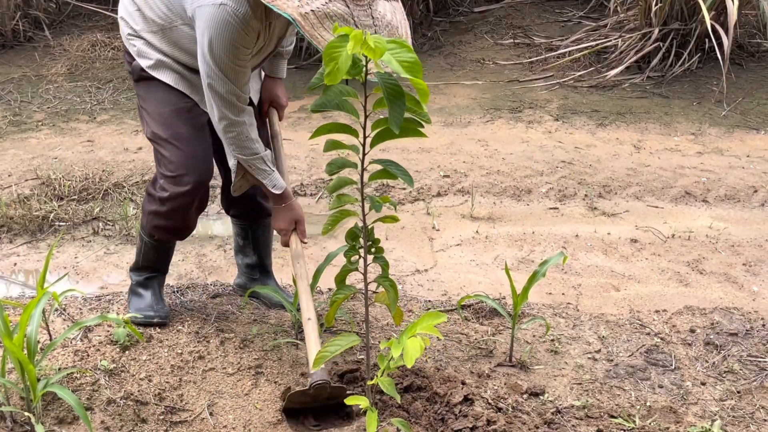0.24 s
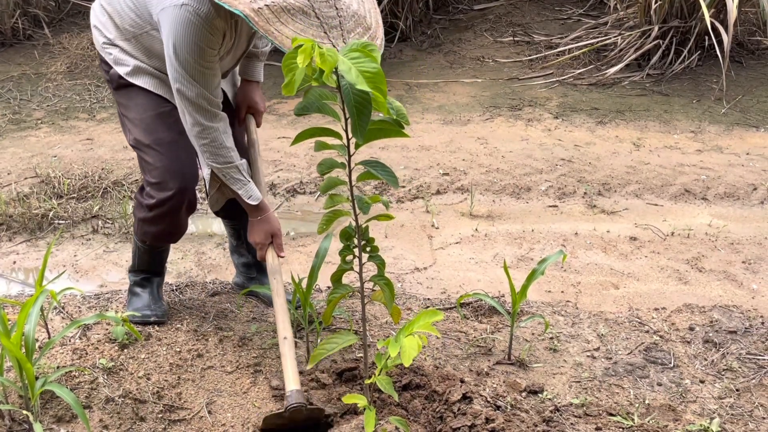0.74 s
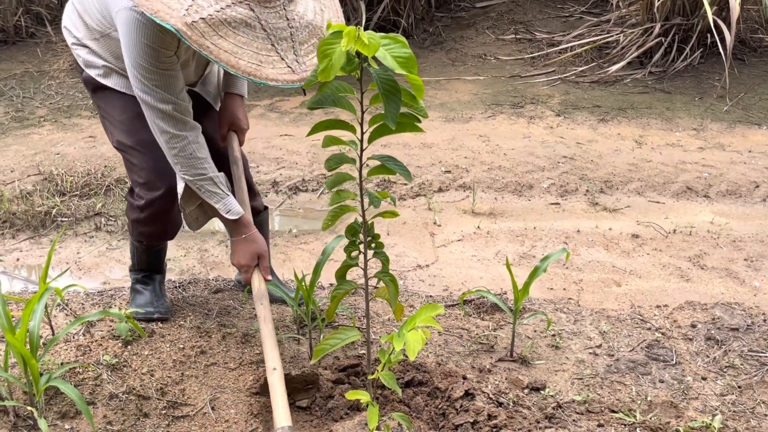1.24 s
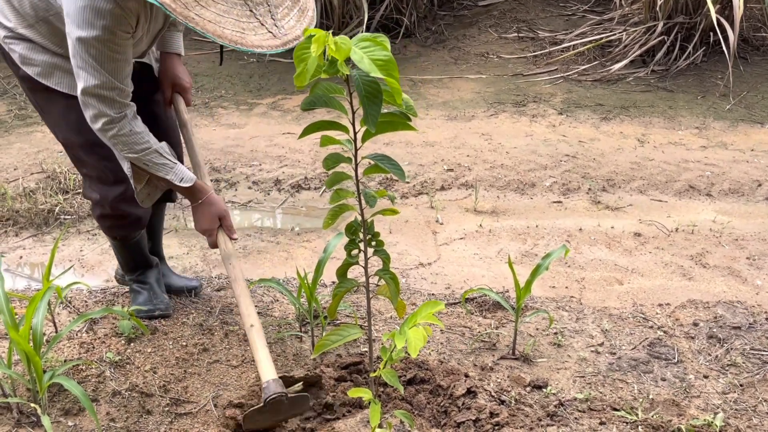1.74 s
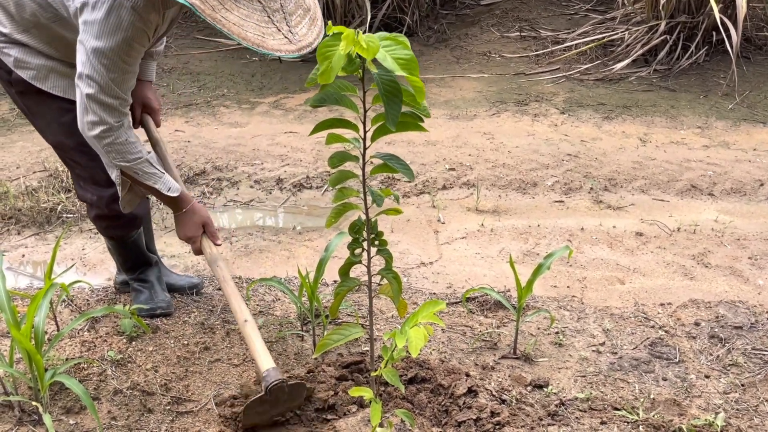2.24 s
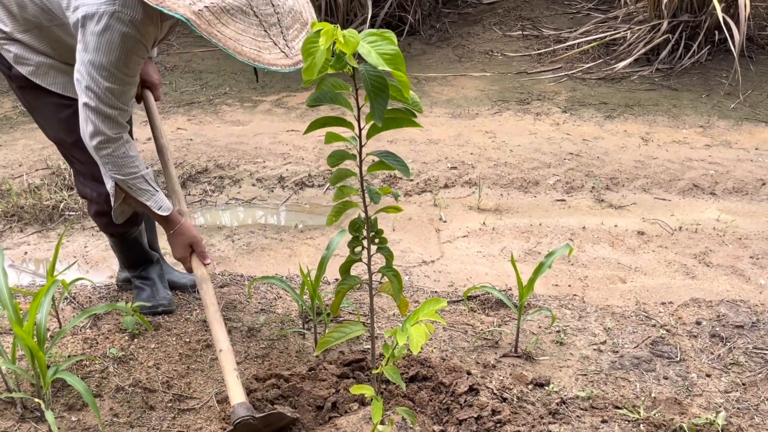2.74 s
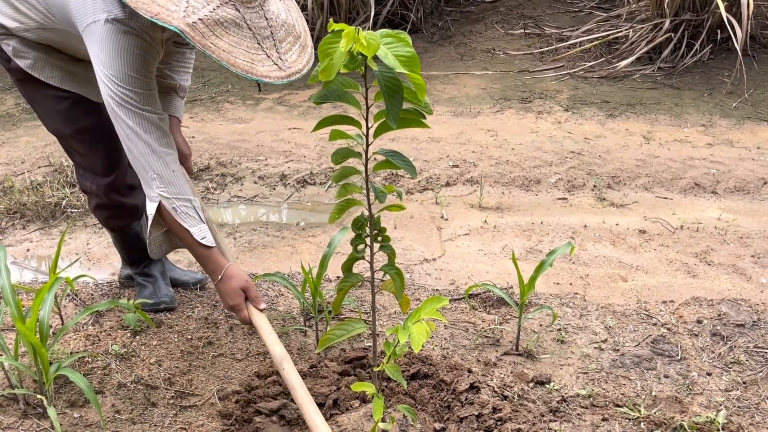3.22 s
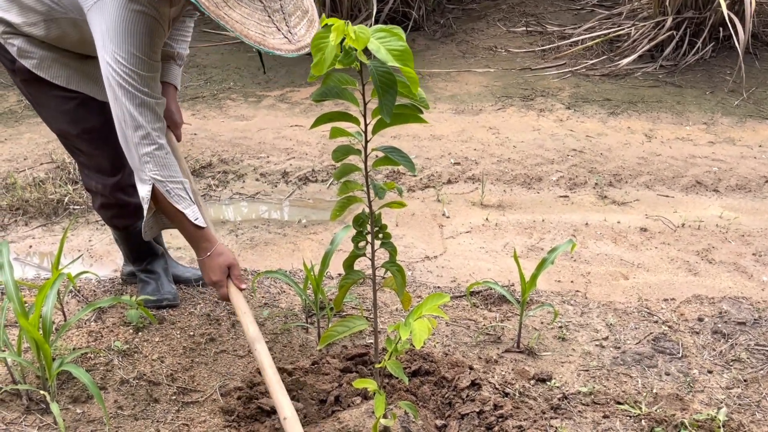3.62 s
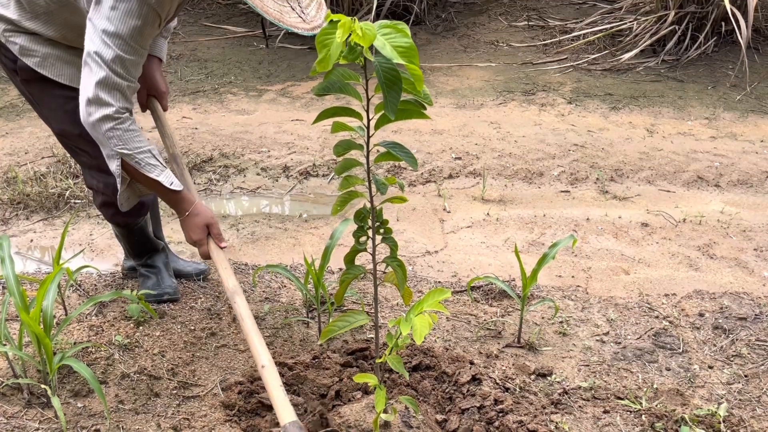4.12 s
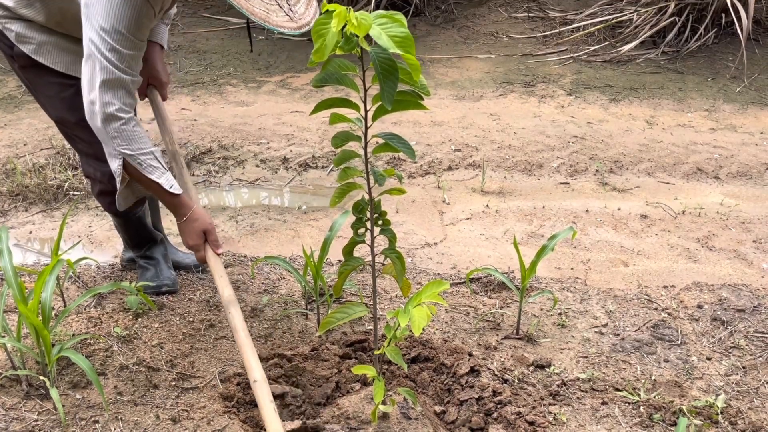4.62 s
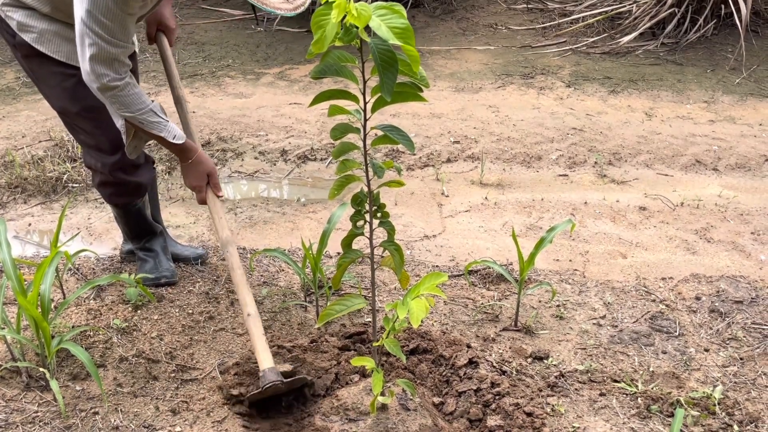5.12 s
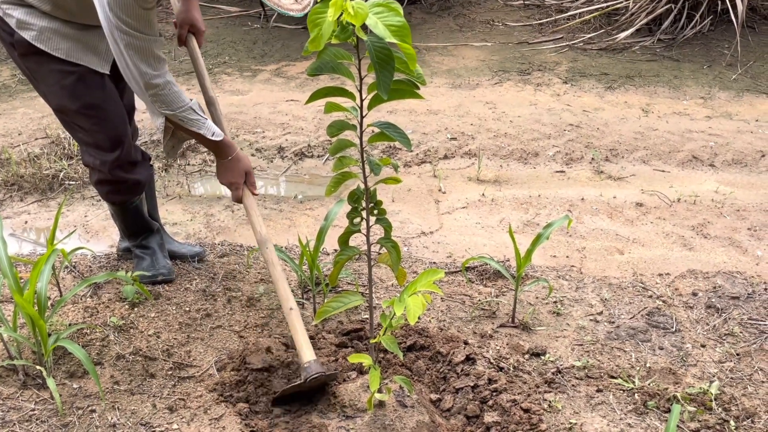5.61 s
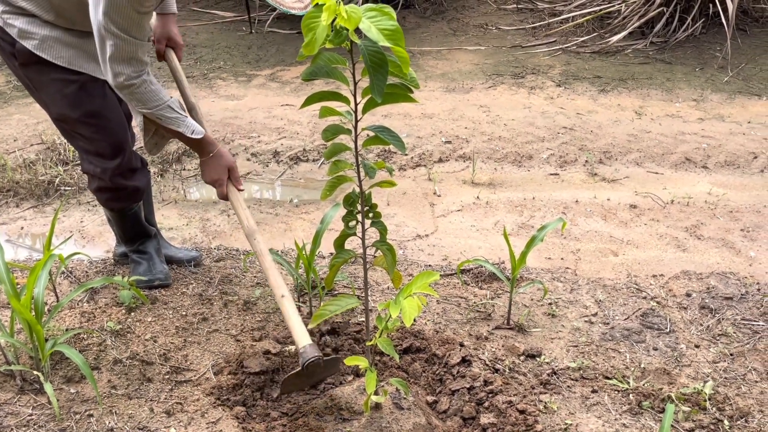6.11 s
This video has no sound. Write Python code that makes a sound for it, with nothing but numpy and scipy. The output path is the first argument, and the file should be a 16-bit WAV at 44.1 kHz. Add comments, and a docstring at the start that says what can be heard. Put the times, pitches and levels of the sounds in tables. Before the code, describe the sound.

A hoe chops and scrapes through gritty soil in steady strokes over a low engine drone, with faint bird hoots late on.

```python
"""From the start a pump engine drones far across the plot, over the faint hiss of the open field.
Close to a phone's two microphone ports a steel hoe chops and drags through gritty soil: friction
hisses and excites the blade's resonances, stones and clods crack against it, and the half-freed
steel tings. Near 2.8 s the edge rasps over a stone. From about 4.5 s, as the hoeing goes on,
a distant bird hoots a falling series."""
import sys
import numpy as np
from scipy import signal
from scipy.fft import rfft, irfft, next_fast_len
from scipy.io import wavfile
from scipy.ndimage import uniform_filter1d, map_coordinates

SR = 44100
rng = np.random.default_rng(int(sys.argv[2]) if len(sys.argv) > 2 else 0)


def bounce(signal):
    """Save signal as a 16-bit WAV file at the path given by the first command-line argument."""
    frames = np.transpose(np.atleast_2d(signal))
    limited = np.clip(frames, -1, 1)
    pcm = np.round(limited * 32767).astype(np.int16)
    wavfile.write(sys.argv[1], SR, pcm)


N = 280476

# Spectra of the field's hiss, the rumble, clods and gravel as heard: frequency_hz, relative_density_db
AIR_SPECTRUM = [(400, -22.5), (700, 9.5), (1500, 9), (3000, 2.5), (6000, -4.5), (10000, -13.5), (11500, -3),
                (13000, -43.5)]
RUMBLE_SPECTRUM = [(15, -23), (25, -35.5), (54, -6.5), (107, -2), (140, -2), (160, 0), (233, -6.5),
                   (325, -23), (401, -30.5), (472, -30.5), (591, -47.5), (900, -90), (1170, -72.5),
                   (1980, -120)]
CLOD_SPECTRUM = [(250, -1.5), (400, 1), (520, 4), (700, -4.5), (1100, -1), (1600, -13.5), (2500, -43)]
GRAVEL_SPECTRUM = [(700, -46), (1200, -4.5), (2000, -1), (3000, 2.5), (4000, -4), (6000, -26)]
# Hiss of grit as heard, the treble dropping away above 13 kHz: frequency_hz, relative_density_db
GRIT_SPECTRUM = [(500, -22), (1200, -25.5), (3000, -17), (6000, -13), (8000, -12.5), (10000, -7.5),
                 (11500, -1.5), (12500, -14.5), (13200, -21.5), (14200, -44.5), (15000, -33), (15800, -46)]
# Wavering loudness of the drone as heard, with chance dips in its tones:
# time_s, rumble_db, main_tone_db, neighbour_tone_db
DRONE_WAVER = [(0.0, -26.5, -34, -36), (0.26, -29, -35, -38.5), (1.31, -26, -33, -29),
               (1.43, -26, -33.5, -42.5), (1.7, -27, -33, -27.5), (1.84, -30.5, -40.5, -58),
               (1.91, -27.5, -35.5, -37.5), (2.85, -29, -35.5, -52), (2.91, -27.5, -39, -36.5),
               (3.72, -27.5, -36.5, -35), (4.38, -28.5, -36, -38), (4.53, -29, -38.5, -56.5),
               (4.71, -28, -36, -37.5), (4.89, -30.5, -39, -53.5), (4.99, -29, -35, -42),
               (5.85, -29.5, -33.5, -52), (6.13, -28, -32.5, -31), (6.36, -26.5, -45, -39.5)]
# Partials of the three engine tones: pitch_hz, relative_level_db, phase_wander_rad
LOW_PARTIALS = [(65.4, -2, 0.58), (126.9, -7, 1.21), (312.5, -19.5, 0.43)]
MAIN_PARTIALS = [(155.3, 1, 0.51), (474, -37.5, 0.98)]
NEIGHBOUR_PARTIALS = [(168.4, -1, 0.6), (217.3, -9, 1.62)]
# Successive hoots of the bird: level_db
HOOT_LEVELS = [-52.5, -51, -50, -50, -47, -52, -57]
# Normal modes of the free blade: pitch_hz, bandwidth_hz, gain_db
BLADE_MODES = [(2392, 35, -4), (3230, 22, -0.5), (4543, 35, 8), (4930, 130, 3), (6520, 71, 8.5),
               (6980, 32, -3.5), (9100, 32, -3.5), (8700, 180, -3)]
# Flicks of the half-freed blade: start_s, lowest_mode_drive_db, upper_modes_drive_db
BLADE_FLICKS = [(0.1844, -30.5, -43), (0.1925, -21, -50), (0.396, -42, -54), (0.422, -38, -71),
                (0.442, -52, -54), (0.6114, -49, -63), (0.9433, -35, -57), (0.9616, -34, -51),
                (1.6286, -38, -50), (1.648, -52, -50), (2.003, -31, -49), (2.192, -33.5, -55),
                (2.2136, -40, -61), (2.235, -33, -54), (2.6983, -46, -60), (2.7423, -35, -64),
                (2.783, -39, -52), (2.8202, -34, -41), (2.8397, -32.5, -50), (2.871, -45, -56),
                (4.0295, -47, -63), (4.048, -38, -54), (4.064, -34.5, -58), (5.3342, -56, -54)]
# Stones and clods meeting the blade: start_s, level_db, knock_offset_db, click_hz, click_offset_db
IMPACTS = [(0.165, -9.5, -31, 2730, -14), (0.1824, -14, -35, 2170, -10), (0.3866, -23, -26, 2500, -11),
           (0.526, -43, -10.5, 2110, -14), (0.7489, -17, -20, 5280, -19), (0.7915, -13, -24.5, 5440, -26),
           (1.0938, -36.5, -14, 1850, -20), (1.339, -22.5, -23.5, 2430, -21), (1.5274, -19, -28, 6500, -4),
           (1.628, -26.5, -19, 2540, -12), (1.771, -27, -21, 5000, -12), (1.7999, -24, -28, 5500, -17),
           (1.9069, -28.5, -21, 1910, -27), (2.0008, -26, -28, 2370, -2), (2.0236, -20.5, -10, 2450, -9),
           (2.0611, -15.5, -15, 4000, -3), (2.616, -26, -14, 2500, -6), (3.3903, -23.5, -12, 3130, -6),
           (3.4403, -39, -11.5, 2200, -12), (3.4529, -40.5, 1, 1860, 3), (3.5043, -38, -17, 2130, -18),
           (3.643, -23.5, -8, 3260, 0), (3.8413, -21.5, -14, 2530, -15), (3.905, -20, -2, 2800, -3.5),
           (3.9134, -24, -9, 2630, -8), (4.4383, -30, -25, 2470, -14), (4.482, -32.5, 3.5, 5000, -17),
           (4.6106, -30, -29, 3280, -9), (4.6589, -35, -19, 4770, 2), (4.8061, -35, -12, 2240, -19),
           (4.8304, -45, -6, 1860, -22), (4.8678, -46, -12.5, 6030, -17), (4.946, -10.5, -19, 2370, -22),
           (4.9786, -23, -5, 3180, -7), (5.339, -38, -20, 4700, -7), (5.4091, -39.5, -15, 2360, -25),
           (5.595, -38, -19, 5180, -13.5), (5.694, -22, -26, 4220, -3.5), (6.2688, -53, 2, 2600, -17)]
# Scrapes of the edge: start_s, rise_s, drag_start_db, drag_s, drag_end_db, fall_db_per_s,
# clod_offset_db, gravel_offset_db, lowest_mode_offset_db
SCRAPES = [(0.0, .002, -61, .1, -69.5, 408, 1, -1, 13),
           (0.152, 0.022, -28, 0.007, -21, 269, -19.5, -15.5, 10),
           (.19, 0.038, -35.5, 0.076, -30.5, 284, -12.5, -8.5, -3.5),
           (.36, .037, -41.5, .005, -45, 278, -19, -12, -1.5), (.47, .2, -57, .005, -58, 520, -7, -2.5, 3),
           (0.739, 0.013, -26.5, 0.042, -20.5, 458, -15, -12, 8.5),
           (.79, 0.022, -30, 0.099, -32.5, 283.5, -13.5, -9, 1),
           (1.16, .16, -67, 0.0088, -61, 400, 3, 3.5, -3),
           (1.331, 0.017, -27.5, 0.2, -34, 600, -14, -10, 7),
           (1.56, 0.021, -46, .03, -50, 200, -20, -4, 6.5),
           (1.61, 0.028, -43.5, .012, -45.5, 127.5, -15.5, -5, 11),
           (1.78, 0.019, -40, .005, -43.5, 400, -16, -18, -16),
           (1.79, 0.04, -48, 0.18, -60, 300, -7, -6.5, -25),
           (1.998, .006, -40, .012, -33, 300, -17, -10.5, 7),
           (2.016, 0.0088, -27, 0.05, -26, 232, -12.5, -7, 3),
           (2.16, 0.064, -40, .003, -37, 700, -30, -8, 5),
           (2.25, 0.021, -60.5, .13, -65.5, 200, -14, -3, 14),
           (2.4, .07, -61, .025, -59, 450, -12, -3.5, -10),
           (2.61, .008, -32, 0.039, -30.5, 230, -12.5, -10, 0.5),
           (2.66, 0.099, -37.5, 0.02, -41.5, 147, -12.5, -11, 5.5),
           (2.758, 0.035, -36, 0.031, -39, 331, -28, -14, 1.5),
           (2.84, 0.017, -49, 0.028, -51, 800, -24, -16, 4.5),
           (3.085, 0.042, -51, .12, -43.5, 448, -27, -40.5, -23),
           (3.378, 0.01, -40.5, .003, -35.5, 342, -9, -4.5, 6.5),
           (3.497, .01, -53.5, .1, -49, 300, -10, -5, 7),
           (3.605, 0.039, -36.5, 0.043, -36.5, 90, -14.5, -5.5, 4.5),
           (3.7, 0.054, -46.5, .085, -43.5, 188, -6, -2.5, 9.5),
           (3.825, 0.066, -33.5, 0.018, -33, 300, -16, -6, -3),
           (3.92, 0.023, -47.5, 0.11, -54.5, 200.5, -7, -1.5, 13),
           (4.02, 0.057, -45, 0.0046, -45, 800, -30, -7, 7), (4.08, .025, -70.5, .3, -85, 301, -5, 2.5, -2),
           (4.434, 0.0093, -44.5, 0.051, -36, 320, -11, -8.5, 3.5),
           (4.599, 0.01, -40.5, .002, -38, 800, -16, -11, -10.5),
           (4.651, 0.0086, -38, 0.016, -37, 378, -14, -8, -5),
           (4.915, .028, -46.5, 0.0022, -38, 520.5, -15, -13, 7),
           (4.946, 0.0019, -38, 0.014, -28, 206, -14, -6.5, 5.5),
           (5.03, 0.035, -41, .003, -39, 190, -11, -6, -1.5),
           (5.11, 0.042, -39.5, .003, -40.5, 296, -12.5, -5.5, 9.5),
           (5.313, 0.026, -49, 0.0026, -50.5, 200, -14, -8, -14),
           (5.49, .022, -68, 0.084, -71, 400, 0, -11.5, 1),
           (5.58, .012, -50.5, .02, -51.5, 300, -15, -12, 2),
           (5.6, 0.051, -38, 0.05, -41.5, 260, -13, -6, -1), (5.72, 0.01, -61, 0.075, -62, 200, 0, 2, 20),
           (5.8, 0.1, -56.5, .17, -66, 401, -7, -4.5, 14),
           (6.13, 0.031, -63.5, 0.011, -67.5, 802, -8, 2, 11.5)]
# The edge skating over a stone drives a single mode: time_s, relative_drive_db
STONE_RASP = [(2.67, -39.5), (2.7, -3.5), (2.8, -1.5), (2.85, -4), (2.88, -40)]
# Differences between the microphone ports: frequency_hz, left_lead_rad, left_excess_db, coherence (0-1)
PORT_RESPONSE = [(60, 0, .7, .98), (300, .05, 1.4, .96), (900, .1, 3, .86), (1500, .1, 3.5, .75),
                 (1900, 0, .6, .88), (2700, 1.2, -1, .8), (3200, 1.8, 2, .75), (4200, 1.6, 7.5, .45),
                 (4800, .1, 9, .3), (5800, .4, 5.5, .45), (6500, -.1, 1.5, .65), (7000, .4, 5, .65),
                 (7500, 1.1, 2.5, .6), (8500, 0, .1, .94), (9200, -1.2, .5, .78), (9850, -2.8, 0, .93),
                 (10250, -3.14, 0, .995), (10550, -3.5, 0, .9), (11000, -4.4, 0, .88),
                 (11800, -6.2, 0, .995), (12400, -6.28, 0, .99), (12900, -6.4, 0, .45),
                 (14300, -6.3, 0, .5), (14800, -6.28, 0, .99)]


def amp(db):
    """Amplitude ratio of a level in decibels."""
    return 10 ** (np.asarray(db) / 20)


def unit_rms(x):
    """Normalisation to unit mean power."""
    return x / np.sqrt(np.mean(x ** 2) + 1e-20)


def at_frequency(table, hz):
    """Interpolation of a table's columns on a logarithmic frequency axis."""
    knots_hz, *columns = np.transpose(table)
    return np.squeeze([np.interp(np.log(hz + 1), np.log(knots_hz + 1), c) for c in columns])


def over_time(table):
    """Linear interpolation of a table's columns, one value per sample."""
    times_s, *columns = np.transpose(table)
    return [np.interp(np.arange(N) / SR, times_s, c) for c in columns]


def wobble(rate):
    """Smooth random modulation with `rate` knots a second."""
    steps = np.arange(0, N + 64, 64)
    coarse = map_coordinates(rng.standard_normal(int(N * rate / SR) + 4), [steps * rate / SR])
    return np.interp(np.arange(N), steps, coarse)


def filtered(x, response, joined=False):
    """Linear filtering by a complex response; `joined` cross-fades mirrored ends against clicks."""
    size = next_fast_len(N + SR // 4)
    fade = np.linspace(1, 0, size - N)
    after_end = 2 * x[..., -1:] - x[..., -2:N - size - 2:-1]
    before_start = 2 * x[..., :1] - x[..., size - N:0:-1]
    padding = joined * (fade * after_end + (1 - fade) * before_start)
    spectrum = rfft(np.concatenate([x, padding], axis=-1))
    return irfft(spectrum * response(np.fft.rfftfreq(size, 1 / SR)), size)[..., :N]


def shaped(x, spectrum):
    """Zero-phase filtering by a tabulated spectrum."""
    return filtered(x, lambda hz: amp(at_frequency(spectrum, hz)))


def coloured(x, spectrum):
    """Spectral shaping at unit mean power."""
    return unit_rms(shaped(x, spectrum))


def air():
    """Ambient noise: the faint broadband hiss of the open field."""
    return amp(-65.5 + .8 * wobble(3)) * coloured(rng.standard_normal((2, N)), AIR_SPECTRUM)


def engine_tone(partials, level_db, swing_db):
    """Outdoor propagation modulates the amplitude and phase of each engine partial."""
    out, t = np.zeros(N), np.arange(N) / SR
    for hz, partial_db, wander_rad in partials:
        strength = amp(partial_db + swing_db * wobble(7))
        phase = 2 * np.pi * hz * t + wander_rad * wobble(5) + rng.uniform(0, 2 * np.pi)
        out += strength * np.sin(phase)
    return np.sqrt(2) * amp(level_db) * out


def pump():
    """Superposition: the engine's line spectrum lies over a continuous rumble, wavering as heard."""
    rumble_db, main_db, neighbour_db = over_time(DRONE_WAVER)
    hum = engine_tone(LOW_PARTIALS, level_db=-35.5, swing_db=2.4)
    hum += engine_tone(MAIN_PARTIALS, main_db, swing_db=2.0)
    hum += engine_tone(NEIGHBOUR_PARTIALS, neighbour_db, swing_db=3.0)
    rumble_gain = amp(rumble_db - 3.5 + 1.36 * wobble(6))
    rumble = rumble_gain * coloured(rng.standard_normal((2, N)), RUMBLE_SPECTRUM)
    return rumble + [[1], [0]] * hum


def bird(first_s=4.57, gap_s=.273, first_hz=383.2, drop_hz=9.2):
    """Frequency glide: each hoot is a rising pure tone in a Gaussian envelope, lower than the last."""
    out, t = np.zeros(N), np.arange(N) / SR
    for k, level_db in enumerate(HOOT_LEVELS):
        from_peak_s = t - first_s - k * gap_s
        envelope = amp(level_db) * np.exp(-(from_peak_s / 0.061) ** 2)
        cycles = (first_hz - k * drop_hz) * (from_peak_s + 0.33 * from_peak_s ** 2)
        out += envelope * np.sin(2 * np.pi * cycles)
    return [[1], [0]] * out


def blade_tings():
    """Free vibration: after a flick each mode decays at a rate set by its bandwidth."""
    out, t = np.zeros(N + SR), np.arange(SR // 5) / SR
    for start_s, lowest_db, upper_db in BLADE_FLICKS:
        for k, (hz, width_hz, gain_db) in enumerate(BLADE_MODES):
            level_db = (upper_db if k else lowest_db) + gain_db + rng.normal(0, 2.1)
            loaded_hz = hz * rng.normal(1, .006)
            envelope = amp(level_db) * (1 - np.exp(-t / 0.0032)) * np.exp(-np.pi * width_hz * t)
            out[round(start_s * SR):][:len(t)] += envelope * np.sin(2 * np.pi * loaded_hz * t)
    return [[1], [.3]] * out[:N]


def impacts(knock_t60_s=0.052, click_t60_s=.022):
    """Impulsive excitation: a contact gives a crack, a dull knock and a brief pitched click."""
    t = np.arange(SR // 10) / SR
    crack, knock, click = np.zeros((3, 2, N + SR))
    for start_s, level_db, knock_db, click_hz, click_db in IMPACTS:
        crack_t60_s = .03 * amp(0.23 * (level_db + 19))  # small contacts are over sooner
        span = slice(round(start_s * SR), round(start_s * SR) + len(t))
        noise = rng.standard_normal((2, 2, len(t)))
        knock_envelope = amp(level_db + knock_db - 60 * t / knock_t60_s) * (1 - np.exp(-t / 0.0033))
        click_envelope = amp(level_db + click_db - 60 * t / click_t60_s) * (1 - np.exp(-t / 0.00089))
        crack[:, span] += amp(level_db - 60 * t / crack_t60_s) * noise[0]
        knock[:, span] += knock_envelope * noise[1]
        click[0, span] += click_envelope * np.sin(2 * np.pi * click_hz * t)
    cracks = shaped(crack[:, :N], GRIT_SPECTRUM)
    knocks = amp(9.5) * shaped(knock[:, :N], CLOD_SPECTRUM)
    return cracks + knocks + click[:, :N]


def blade_resonance(drive, modes, damping):
    """Forced vibration of damped modes: soil multiplies every bandwidth by `damping`."""
    def response(hz):
        total = 0
        for k, (mode_hz, width_hz, gain_db) in enumerate(modes):
            loss = 1j * hz * width_hz * damping
            total += (-1) ** k * amp(gain_db) * loss / (mode_hz ** 2 - hz ** 2 + loss)
        return total
    return filtered(drive, response)


def crunch(grains_per_s, spread_db, decay_s, patchy_db):
    """A Poisson process: noise flares with each crushed grain and drifts in patches of colour."""
    grains = (rng.random(N) < grains_per_s / SR) * amp(spread_db * rng.exponential(size=N))
    flare = signal.lfilter([1], [1, -np.exp(-1 / (decay_s * SR))], np.pad(grains, (0, 256)))
    frames = signal.stft((1 + flare) * rng.standard_normal((2, N + 256)), nperseg=256)[2]
    patches = uniform_filter1d(rng.standard_normal(frames.shape[1:]), 4, axis=0)
    patches = unit_rms(uniform_filter1d(patches, 8, axis=1))
    return unit_rms(signal.istft(frames * amp(patchy_db * patches), nperseg=256)[1][:, :N])


def scrape_envelopes(rise_power=0.92, trickle_db_per_s=128.5, coarser_db=11.5):
    """Incoherent scrapes add in power, giving the amplitudes of grit, clods, gravel and lowest mode."""
    power, t = np.zeros((4, N + SR)), np.arange(SR * 2 // 3) / SR
    coarsening = amp([[0], [coarser_db], [coarser_db / 2], [coarser_db / 2]])
    for start_s, rise_s, start_db, drag_s, end_db, fall_db_per_s, *offsets_db in SCRAPES:
        swell = np.minimum(t / rise_s, 1) ** rise_power
        drag = amp(np.interp(t, [rise_s, rise_s + drag_s], [start_db, end_db]))
        layers = swell * drag * amp([0, *offsets_db])[:, None]
        after_s = np.maximum(t - rise_s - drag_s, 0)
        release = amp(-fall_db_per_s * after_s)
        # loosened soil runs off afterwards, more of it from cloddy ground
        trickle = amp(-10 + .7 * offsets_db[0] - trickle_db_per_s * after_s) * (after_s > 0)
        start = round(start_s * SR)
        power[:, start:start + len(t)] += layers ** 2 * (release ** 2 + (coarsening * trickle) ** 2)
    return np.sqrt(power[:, :N])


def hoe():
    """Sliding friction: sand hisses on the steel and drives its modes; gravel and clods crunch."""
    grit_gain, clod_gain, gravel_gain, ring_gain = (
        scrape_envelopes() * amp(0.64 * wobble(30)))  # the edge catches and slips
    sand = crunch(grains_per_s=350, spread_db=-6.5, decay_s=0.00084, patchy_db=1.5)
    clods = crunch(grains_per_s=90, spread_db=3.5, decay_s=0.0011, patchy_db=-0.5)
    gravel = crunch(grains_per_s=180, spread_db=-3.5, decay_s=0.00056, patchy_db=2.0)
    soil = grit_gain * coloured(sand, GRIT_SPECTRUM)
    soil += clod_gain * coloured(clods, CLOD_SPECTRUM)
    soil += gravel_gain * coloured(gravel, GRAVEL_SPECTRUM)
    # the lowest mode rings broadly where soil grips the steel, narrowly where it lets go
    gripped = ring_gain * amp(1.9 * wobble(25))
    freed = ring_gain * amp(-4.5 + 3.5 * wobble(12))
    rasp = grit_gain * amp(over_time(STONE_RASP)[0] + 9)
    upper = np.sqrt(grit_gain * ring_gain) * amp(-6.5 + 1.95 * wobble(25))
    steel = blade_resonance(gripped * sand, BLADE_MODES[:1], damping=7.3)
    steel += blade_resonance(freed * sand, BLADE_MODES[:1], damping=1.3)
    steel += blade_resonance(rasp * sand, BLADE_MODES[3:4], damping=1.3)
    steel += blade_resonance(upper * sand, BLADE_MODES[1:], damping=2.6)
    return soil + steel


def scene():
    """Superposition of all sources: row 0 reaches both ports alike, row 1 in antiphase."""
    return hoe() + impacts() + blade_tings() + pump() + bird() + air()


def record(dry):
    """Diffraction: the phone's body delays and shades each port differently, within a band limit."""
    def ports(hz, band_limit_hz=15820):
        lead_rad, excess_db, coherence = at_frequency(PORT_RESPONSE, hz)
        angle = np.arccos(np.clip(coherence, 0, 1)) / 2
        mixing = np.array([[np.cos(angle), np.sin(angle)], [np.cos(angle), -np.sin(angle)]])
        left_gain = amp(excess_db / 2) * np.exp(.5j * lead_rad)
        return mixing * [[left_gain], [1 / left_gain]] * (hz < band_limit_hz)
    return filtered(dry, ports, joined=True).sum(axis=1)


dry = scene()
out = record(dry)
bounce(out)
```